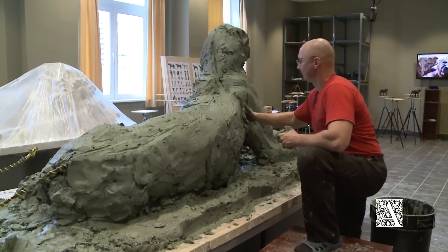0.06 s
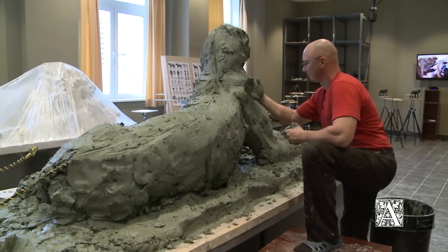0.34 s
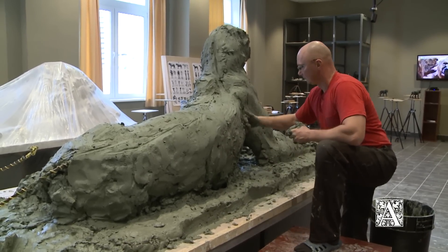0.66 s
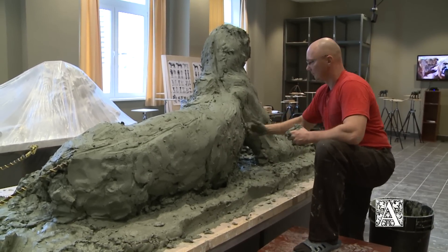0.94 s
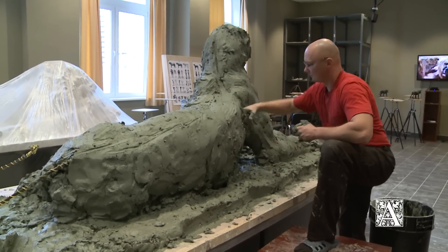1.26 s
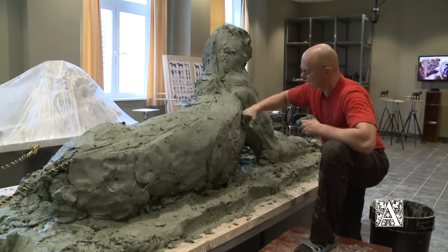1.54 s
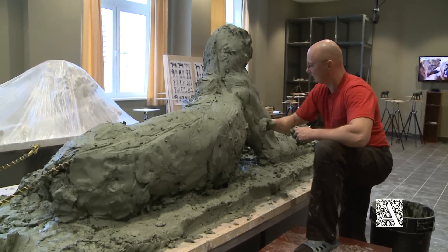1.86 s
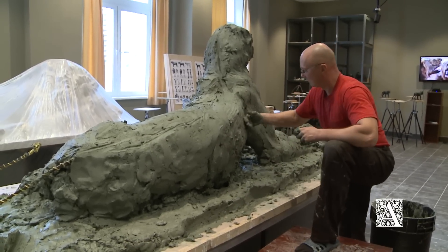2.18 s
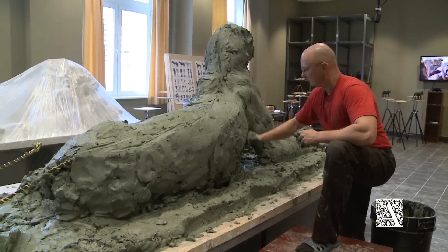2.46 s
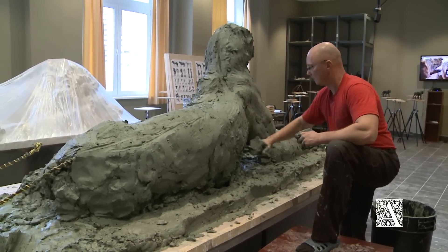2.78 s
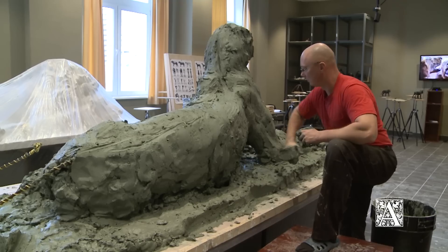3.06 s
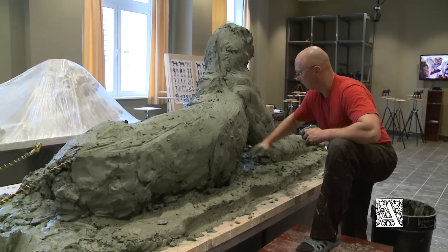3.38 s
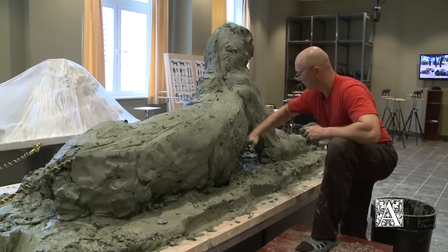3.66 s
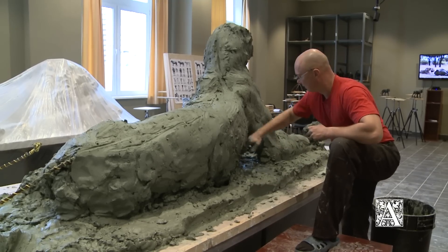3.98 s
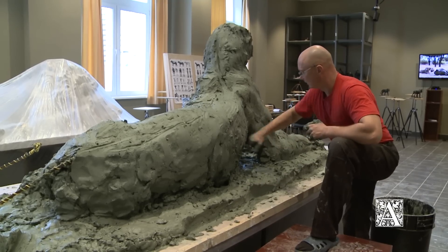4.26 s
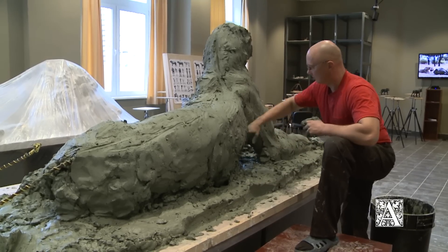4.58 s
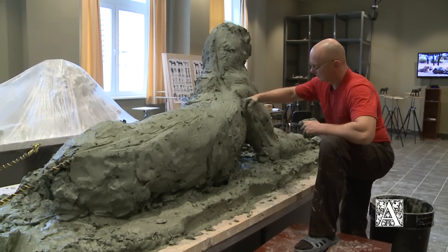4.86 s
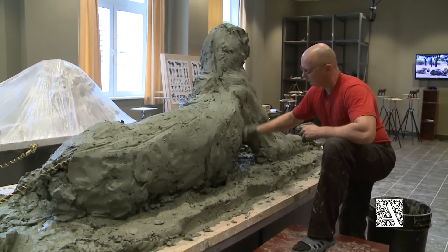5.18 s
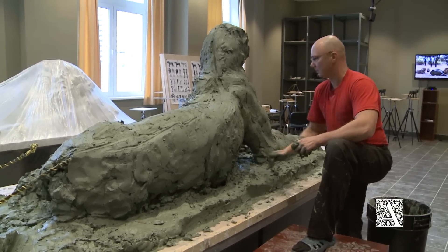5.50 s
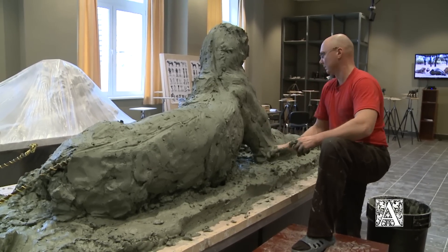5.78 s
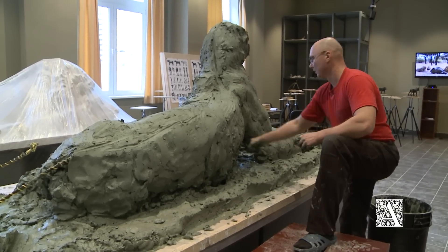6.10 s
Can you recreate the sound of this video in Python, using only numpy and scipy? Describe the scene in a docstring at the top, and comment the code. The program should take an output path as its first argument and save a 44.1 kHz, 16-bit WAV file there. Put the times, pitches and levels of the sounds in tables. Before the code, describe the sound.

Ventilation murmurs steadily in a large hall while wet clay is rubbed by hand, a few metres from a stereo microphone. The quiet strokes hiss and click stickily, with some dull knocks nearby on the left. Then come five loud slaps, each a thud with a sharp pop and a wet splatter ringing through the room. Sparse clicks, another knock and fainter smearing close the sequence.

```python
"""A sculptor's studio hall, a camera's stereo microphone a few metres from a large wet clay figure.
Ventilation murmurs throughout. First the hand smears the clay: stick-slip strokes, clicks of snapping
threads and bursting air pockets, a few dull knocks close by. From 3.3 to 4.5 s five hard slaps pack
the clay down, each a thud, a pop of trapped air and a wet spray that ring through the hall.
Last come a few more clicks, one knock and fading strokes."""
import sys
import numpy as np
from scipy import signal
from scipy.fft import rfft, irfft, next_fast_len
from scipy.io import wavfile
from scipy.ndimage import map_coordinates

SR = 44100
rng = np.random.default_rng(int(sys.argv[2]) if len(sys.argv) > 2 else 0)


def master_out(mix):
    """Clip the mix to full scale and print it as 16-bit PCM to the path in sys.argv[1]."""
    frames = np.transpose(np.atleast_2d(mix))
    ceiling = np.clip(frames, -1, 1)
    pcm = np.round(ceiling * 32767).astype(np.int16)
    wavfile.write(sys.argv[1], SR, pcm)


N = 270584
LEAD_S = .012  # a contact peaks this long after its burst starts

# the hall's decay: (frequency [Hz], time to fall 60 dB [s])
HALL_T60 = [(100, 1.1), (300, 1.27), (800, 1.61), (2000, 1.29), (4800, 1), (8000, 0.71), (13000, 0.41)]
# colour of what the walls return: (frequency [Hz], level [dB])
WALL_SPECTRUM = [(100, 4), (300, -1.5), (600, -4), (1100, 0.5), (2400, -1.5), (4000, 8.5), (5500, 0.5),
                 (9000, -0.5), (15000, 1)]
# diffuse sound at the two capsules: (frequency [Hz], left-right correlation [-1 to 1])
CAPSULE_CORRELATION = [(100, 1), (500, .96), (1000, 0.91), (2000, 0.79), (3000, 0.035), (4150, -0.97),
                       (5500, 0.32), (6500, -0.013), (14000, 0.1)]
# the microphone's treble colour: (frequency [Hz], gain [dB])
MIC_RESPONSE = [(2800, 0), (3400, -1), (4200, 0.5), (4500, 0.5), (4850, -2), (5600, -4), (6350, 2),
                (7500, -1.5), (10000, 1), (11400, 4), (12300, 1), (13200, 2.5), (14200, 0)]
# ventilation air: (frequency [Hz], level [dB])
VENT_SPECTRUM = [(18, -41), (30, -9.5), (109, -5), (165, -5), (189, -4.5), (303, -6), (328, -9),
                 (584, -11.5), (632, -13), (866, -14.5), (937, -20), (1960, -22.5), (3670, -25),
                 (10800, -34), (16000, -30)]
# fan tones: (frequency [Hz], level [dB])
FAN_TONES = [(143, -63), (188, -68), (229, -63), (299, -62.5), (591, -65.5)]
# dull knocks close to the microphone: (time [s], level [dB])
KNOCK_EVENTS = [(0.816, -40), (0.8623, -40.5), (1.3684, -30.5), (5.052, -41)]
# body of a knock: (frequency [Hz], level [dB])
KNOCK_SPECTRUM = [(100, -21), (330, -0.5), (600, -10.5), (850, -1.5), (1050, -0.5), (1300, 0.5),
                  (1700, -8.5), (2500, -7), (3200, -23), (9000, -37)]
# smearing strokes: (peak time [s], length [s], level [dB], wetness [0-1], drag level [dB])
STROKE_EVENTS = [(.005, 0.11, -44.5, 0.24, -65), (.278, 0.075, -35, 0.62, -47.5),
                 (0.991, 0.1, -37, 0.62, -50.5), (1.24, 0.23, -43.5, 0.25, -44),
                 (1.521, .06, -53, 0.43, -61), (1.658, .09, -45, 0.33, -49),
                 (2.142, 0.47, -55.5, .08, -61.5), (2.389, 0.09, -47.5, 0.4, -57),
                 (2.541, 0.16, -47, 0.5, -56), (2.676, 0.094, -45.5, .38, -68),
                 (3.28, .028, -20.5, .45, -32), (5.29, 0.093, -47.5, .45, -51.5),
                 (5.659, .046, -55.5, 1, -61), (5.897, 0.067, -58.5, 0.6, -69), (6.11, 0.2, -73, .3, -52.5)]
# wet clay hissing: (frequency [Hz], level [dB])
HISS_SPECTRUM = [(1500, -40), (3000, -1), (4500, 0.5), (8000, -1.5), (11500, -1.5), (16000, -6.5)]
# dry clay rubbing: (frequency [Hz], level [dB])
RUB_SPECTRUM = [(650, -35), (1050, -13), (1330, -6.5), (1550, -4), (1850, -1.5), (2500, 4), (3000, -9),
                (3700, -13), (5000, -24), (8000, -62)]
# low drag under a stroke: (frequency [Hz], level [dB])
DRAG_SPECTRUM = [(100, -17), (220, 3.5), (600, -3), (1150, -4), (1800, -13.5), (4000, -64.5)]
# threads of sticky clay snapping: (time [s], level [dB], treble tilt [dB/octave])
SNAP_EVENTS = [(0.2121, -36.5, -5), (0.7338, -42.5, 6), (0.915, -46, 3), (1.368, -46, 1.5),
               (1.4968, -52, 0.5), (1.6979, -50, 12), (1.743, -48, 4), (2.3446, -37, -2.5),
               (2.3966, -44, 4), (2.484, -47, 15), (2.563, -42.5, 10), (3.7657, -34, 7),
               (4.642, -32.5, -3.5), (4.792, -50.5, 9.5), (5.135, -49, -0.5), (5.2475, -50.5, 11.5),
               (5.6107, -51.5, 2)]
# one thread's snap: (frequency [Hz], level [dB])
SNAP_SPECTRUM = [(600, -27), (2500, 1.5), (4000, -5), (7000, 0), (11500, -2.5), (16000, -9.5)]
# small air pockets bursting: (time [s], level [dB], pitch [Hz])
POP_EVENTS = [(0.2119, -37.5, 2200), (1.368, -37.5, 2520), (1.6348, -39.5, 1820), (2.3444, -42.5, 2420),
              (4.642, -35, 1880)]
# resonance of trapped air: (frequency [multiple of its pitch], level [dB])
POCKET_RESONANCE = [(.1, -43.5), (.5, -20.5), (.75, -6), (1, 2.5), (1.141, -0.5), (1.36, -22.5), (2, -21),
                    (6, -43)]
# hard blows, the first two rows one double slap: (time [s], pop level [dB], pocket pitch [Hz],
# thud level [dB], hollow pitch [Hz], spray level [dB], spray tilt [dB/octave], hall send [dB],
# hall bass lift [dB, weighted by band], peel level [dB])
SLAP_EVENTS = [(3.26, -20.5, 2230, -26, 735, -31, -1, -6.5, -13, -43),
               (3.2652, -14.5, 2170, -21, 580, -17, -2, 0.4, 0, -31.5),
               (3.666, -14.5, 2470, -21.5, 836, -24.5, 0, 3, 7, -25),
               (3.953, -22.5, 2320, -23, 554, -30.5, 0.5, 3.5, 1, -37.5),
               (4.2081, -18, 2380, -26.5, 785, -27, -1.5, 3, 4.5, -40),
               (4.46, -26.5, 2390, -24.5, 780, -30, -4, 4.5, 0.5, -55)]
# the struck clay mass: (frequency [Hz], level [dB])
THUD_SPECTRUM = [(40, -28.5), (105, -5.5), (160, -6), (260, -2), (340, -1.5), (420, -3.5), (600, -4),
                 (800, -0.5), (1020, -5), (1350, 0), (1520, -3.5), (1800, -3.5), (3200, -15.5),
                 (8000, -64.5)]
# wet surfaces meeting: (frequency [Hz], level [dB])
SPRAY_SPECTRUM = [(500, -45.5), (2500, -2.5), (3600, 2), (5000, 0), (8000, -1), (11500, -0.5), (16000, 0.5)]


def amp(db):
    return 10 ** (np.asarray(db) / 20)


def unit_rms(x):
    return x / np.sqrt(np.mean(x ** 2) + 1e-20)


def along(points, hz):
    """Interpolate (frequency, value) points on a log frequency axis."""
    freqs, values = np.transpose(points)
    return np.interp(np.log(hz + 1e-9), np.log(freqs), values)


def wobble(knots_per_s, size=N):
    """A smooth random curve."""
    position = np.arange(size) * knots_per_s / SR
    return map_coordinates(rng.standard_normal(int(position[-1]) + 4), [position])


def filtered(x, response):
    """Apply a gain given as a function of frequency."""
    size = x.shape[-1]
    padded = next_fast_len(size + 8192)
    return irfft(rfft(x, padded) * response(np.fft.rfftfreq(padded, 1 / SR)), padded)[..., :size]


def coloured(x, spectrum):
    return filtered(x, lambda hz: amp(along(spectrum, hz)))


def tilted(spectrum, tilt_db):
    """Wetter clay sounds brighter: the treble leans by tilt_db an octave."""
    return [(hz, db + tilt_db * np.log2(max(hz, SR / 16) / SR)) for hz, db in spectrum]


def add(track, at_s, sound):
    start = max(round(at_s * SR), 0)
    part = sound[..., :N - start]
    track[:, start:start + part.shape[-1]] += part


def diffuse(size):
    """Noise arriving from all sides at two close capsules."""
    def mid_side_gains(hz):
        angle = np.arccos(np.clip(along(CAPSULE_CORRELATION, hz), -1, 1)) / 2
        return np.array([np.cos(angle), np.sin(angle)])
    mid, side = filtered(rng.standard_normal((2, size)), mid_side_gains)
    return np.array([mid + side, mid - side])


def ventilation():
    """The room tone: a steady murmur of air with faint wavering fan tones."""
    t = np.arange(N) / SR
    fans = sum(amp(db + 1.6 * wobble(8.8)) * np.sin(2 * np.pi * hz * t + 1.2 * wobble(6.6))
               for hz, db in FAN_TONES)
    air = unit_rms(coloured(diffuse(N), VENT_SPECTRUM))
    return amp(-52) * air + fans


def hall(x, bass_db=0, build_s=.0071, early_db=3, early_t60=.12):
    """The hall's answer at the microphone: strong early walls, then a tail whose treble dies first."""
    hz, t, bands = signal.stft(diffuse(2 * SR), SR, nperseg=256)
    decay = amp(-60 * t / along(HALL_T60, hz)[:, None])
    tail = signal.istft(bands * decay, SR, nperseg=256)[1]
    bass_weight = [(900, .9), (1900, .089)]
    tail = filtered(tail, lambda f: amp(along(WALL_SPECTRUM, f) + bass_db * along(bass_weight, f)))
    t = np.arange(tail.shape[1]) / SR
    build_up = 1 - np.exp(-(t / build_s) ** 2)
    early_walls = 1 + amp(early_db - 60 * t / early_t60) / 2
    tail *= build_up * early_walls
    return signal.fftconvolve(x[None], tail / np.sqrt(SR * .085), axes=1)


def direct(x, pan_db, spread):
    """The straight path, its treble scattered by the camera body; positive pan_db is to the left."""
    taps = SR // 1000
    scattered = signal.fftconvolve(x, rng.standard_normal(taps) / np.sqrt(taps))[:len(x)]
    side = filtered(scattered, lambda hz: spread * along([(900, .1), (2500, 1), (5000, 1.74)], hz))
    return np.array([x + side, x - side]) * amp([[pan_db / 2], [-pan_db / 2]])


def contact(spectrum, swell_s, t60, size=4096):
    """A short burst of force rings through a spectrum; rms 1 when counted over 10 ms."""
    t = np.arange(size) / SR - LEAD_S
    envelope = amp(np.where(t < 0, 20 * t / swell_s, -60 * t / t60))
    burst = envelope * rng.standard_normal(size)
    for _ in range(3):  # the blow feeds all frequencies evenly, yet stays short
        bins = rfft(burst)
        burst = irfft(bins / (abs(bins) + 1e-9)) * np.minimum(10 * envelope, 1)
    # minimum phase: the ringing follows the blow
    cepstrum = irfft(np.log(amp(along(spectrum, np.fft.rfftfreq(size, 1 / SR)))))
    cepstrum[1:size // 2] *= 2
    cepstrum[size // 2 + 1:] = 0
    ringing = irfft(rfft(burst) * np.exp(rfft(cepstrum)))
    return unit_rms(ringing) * np.sqrt(SR / 100 / size)


def knocks(ring_hz=388, ring_t60=.13, ring_db=-4.5):
    """Soft knocks close by on the left, nearly dry, with a short hollow ring."""
    out = np.zeros((2, N))
    t = np.arange(SR // 5) / SR
    for at_s, db in KNOCK_EVENTS:
        knock = amp(db) * contact(KNOCK_SPECTRUM, swell_s=.005, t60=.051)
        ring = amp(db + ring_db - 60 * t / ring_t60) * np.sin(2 * np.pi * ring_hz * t)
        add(out, at_s - LEAD_S, direct(knock, pan_db=5.5, spread=1))
        add(out, at_s + .00396, ring)
        add(out, at_s - LEAD_S, amp(-15.5) * hall(knock))
    return out


def snap(tilt_db, uneven_db=2):
    """One thread of clay snaps, with a colour of its own."""
    colour = [(hz, db + uneven_db * rng.standard_normal()) for hz, db in tilted(SNAP_SPECTRUM, tilt_db)]
    return contact(colour, swell_s=.00086, t60=.0105)


def air_pocket(pitch_hz, swell_s, t60):
    """Air resonates as it is squeezed out between two wet faces."""
    return contact([(multiple * pitch_hz, db) for multiple, db in POCKET_RESONANCE], swell_s, t60)


def clicks(snap_hall_db=1, pop_hall_db=-2):
    """Threads snap and small pockets burst as the hand touches and lifts."""
    out = np.zeros((2, N))
    snaps = [(at_s, amp(db) * snap(tilt_db), snap_hall_db) for at_s, db, tilt_db in SNAP_EVENTS]
    pops = [(at_s, amp(db) * air_pocket(hz, swell_s=.00085, t60=.0085), pop_hall_db)
            for at_s, db, hz in POP_EVENTS]
    for at_s, click, hall_db in snaps + pops:
        add(out, at_s - LEAD_S, direct(click, pan_db=-1.5, spread=.35))
        add(out, at_s - LEAD_S, amp(hall_db) * hall(click))
    return out


def friction(spectrum, grain_db, grains_per_s, size=32768):
    """Stick and slip: noise of rms 1 that clumps into grains."""
    grip = amp(grain_db * wobble(grains_per_s, size))
    return unit_rms(coloured(grip * rng.standard_normal(size), spectrum))


def pressed(sound, peak_s, length_s, rise_share=.42):
    """Hand pressure swells to a peak and lets go more slowly; gives (start time, shaped sound)."""
    start_s = max(peak_s - len(sound) / SR / 2, 0)
    t = start_s + np.arange(len(sound)) / SR - peak_s
    width_s = length_s * np.where(t < 0, rise_share, 1 - rise_share)
    return start_s, sound * np.exp(-(t / width_s) ** 2)


def strokes(dry_tilt_db=-5.5, wet_tilt_db=4, tick_db=-7.5, tick_scatter_db=3.5):
    """Dry clay rubs, wet clay hisses brightly and ticks at random; a low drag lies under both."""
    track = np.zeros((1, N))
    for peak_s, length_s, db, wetness, drag_db in STROKE_EVENTS:
        wet_gain = amp(db) * np.sin(wetness * np.pi / 2)
        dry_gain = amp(db) * np.cos(wetness * np.pi / 2)
        tilt_db = dry_tilt_db + wetness * (wet_tilt_db - dry_tilt_db)
        hiss = wet_gain * friction(tilted(HISS_SPECTRUM, tilt_db), grain_db=5, grains_per_s=900)
        rub = dry_gain * friction(RUB_SPECTRUM, grain_db=5, grains_per_s=370)
        drag = amp(drag_db) * friction(DRAG_SPECTRUM, grain_db=2.5, grains_per_s=120)
        add(track, *pressed(hiss + rub + drag, peak_s, length_s))
        for offset, strength in rng.standard_normal((3, 2)):
            tick = wet_gain * amp(tick_db + tick_scatter_db * strength) * snap(tilt_db=3)
            add(track, min(peak_s + offset * length_s / 3, N / SR) - LEAD_S, tick)
    return track[0]


def peels(longest_stick_s=.13, stick_s_per_db=.005):
    """After each blow the hand peels off with a bright crackle; a softer blow lets go sooner."""
    track = np.zeros((1, N))
    hardest_db = max(pop_db for _, pop_db, *_ in SLAP_EVENTS)
    for at_s, pop_db, *_, peel_db in SLAP_EVENTS:
        stuck_s = longest_stick_s - stick_s_per_db * (hardest_db - pop_db)
        crackle = friction(tilted(HISS_SPECTRUM, tilt_db=8), grain_db=6.5, grains_per_s=800)
        add(track, *pressed(amp(peel_db) * crackle, at_s + stuck_s, length_s=.056))
    return track[0]


def smears():
    """Strokes and peels from a few metres off, more hall than direct sound."""
    clay = strokes() + peels()
    return amp(-7) * direct(clay, pan_db=-1, spread=.51) + amp(-3) * hall(clay)[:, :N]


def slaps(swell_s=.00138):
    """Each blow thuds into the mass, rings the hollow under the hand, pops an air pocket and sprays."""
    out = np.zeros((2, N))
    for (at_s, pop_db, pocket_hz, thud_db, hollow_hz,
         spray_db, tilt_db, hall_db, bass_db, _) in SLAP_EVENTS:
        pop = amp(pop_db) * air_pocket(pocket_hz, swell_s, t60=.016)
        thud = amp(thud_db) * contact(THUD_SPECTRUM, 2 * swell_s, t60=.025)
        hollow = amp(thud_db - 3) * air_pocket(hollow_hz, swell_s, t60=.02)
        spray = amp(spray_db) * contact(tilted(SPRAY_SPECTRUM, tilt_db), swell_s, t60=.015)
        straight = direct(pop + thud + hollow + spray, pan_db=-.5, spread=.22)
        # pop, thud, and hollow with spray each ring out in their own diffuse hall tail
        reverb = hall(pop) + hall(thud, bass_db) + hall(amp(-2) * hollow + spray, bass_db)
        add(out, at_s - LEAD_S, straight)
        add(out, at_s - LEAD_S + .011, amp(-11) * straight)  # a bounce off the floor
        add(out, at_s - LEAD_S, amp(hall_db) * reverb)
    return out


def scene():
    """All that reaches the microphone, leaning slightly to the right."""
    return (slaps() + clicks() + knocks() + smears() + ventilation()) * amp([[-.4], [.4]])


def record(dry):
    """The microphone colours the treble; the camera clips at full scale and cuts off steeply on top."""
    band_limit_hz = 15950
    clipped = np.clip(coloured(dry, MIC_RESPONSE), -1, 1)
    return filtered(clipped, lambda hz: 1 / (1 + (hz / band_limit_hz) ** 150))


dry = scene()
out = record(dry)
master_out(out)
```